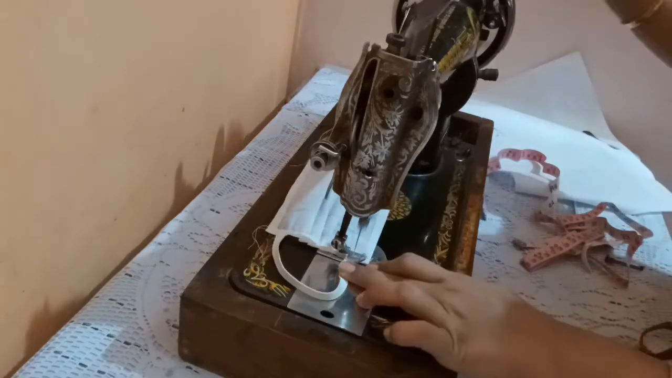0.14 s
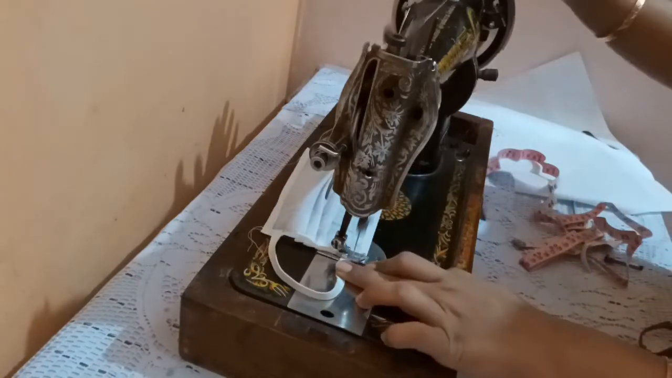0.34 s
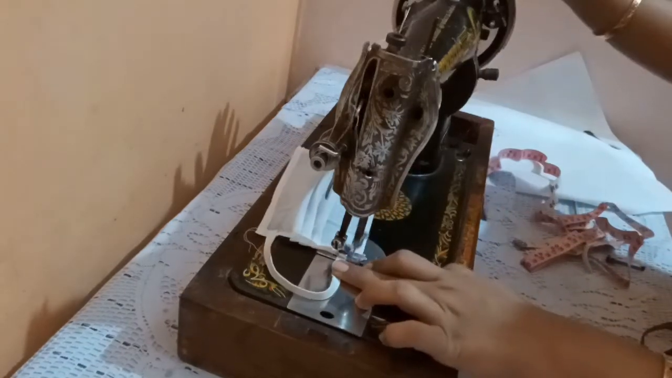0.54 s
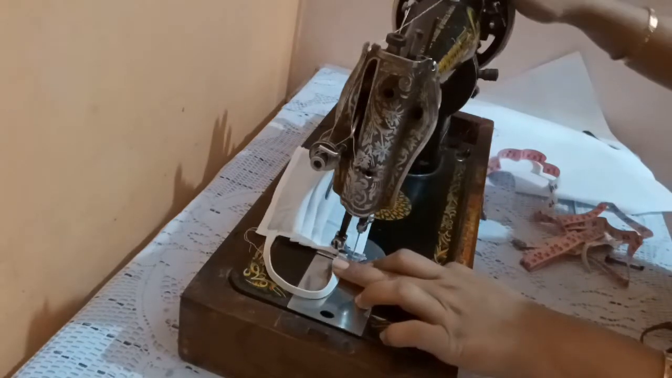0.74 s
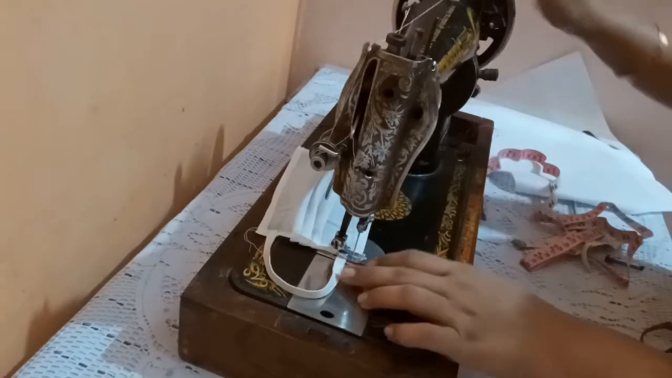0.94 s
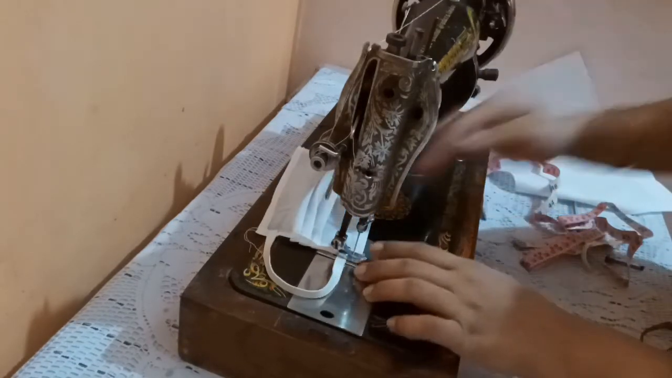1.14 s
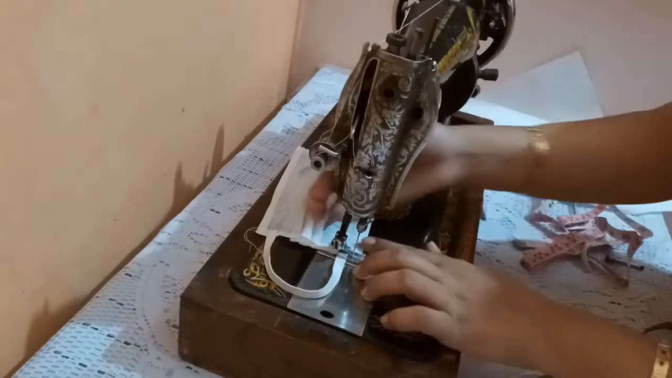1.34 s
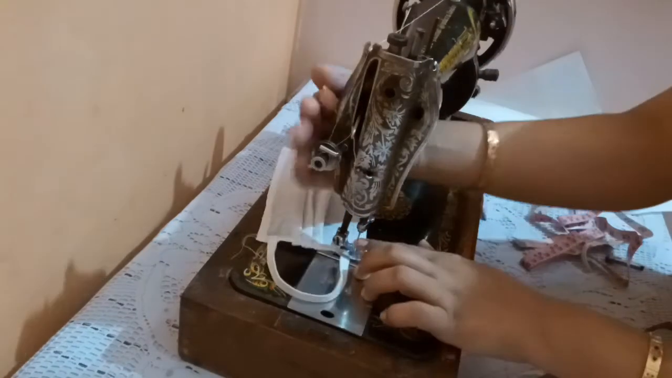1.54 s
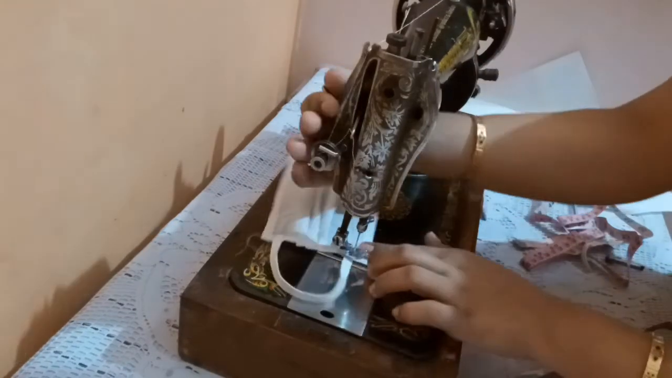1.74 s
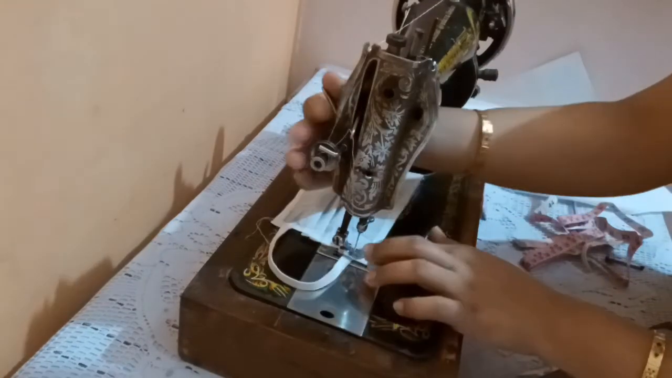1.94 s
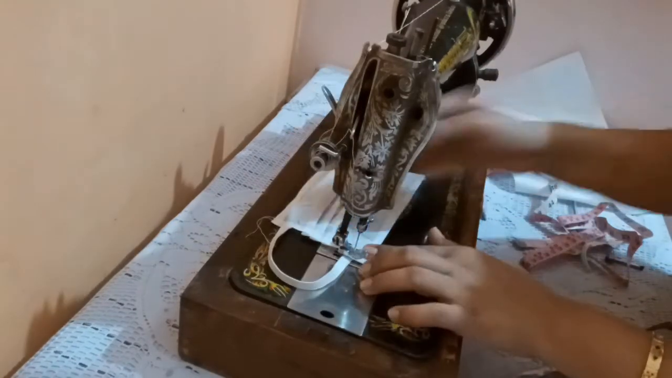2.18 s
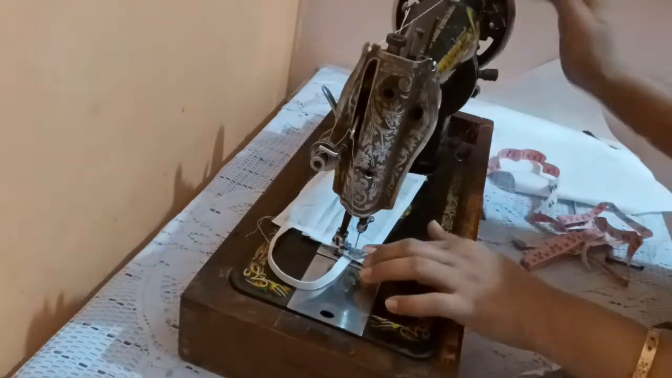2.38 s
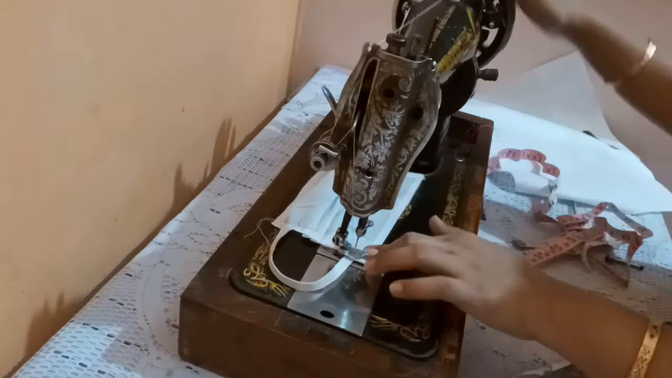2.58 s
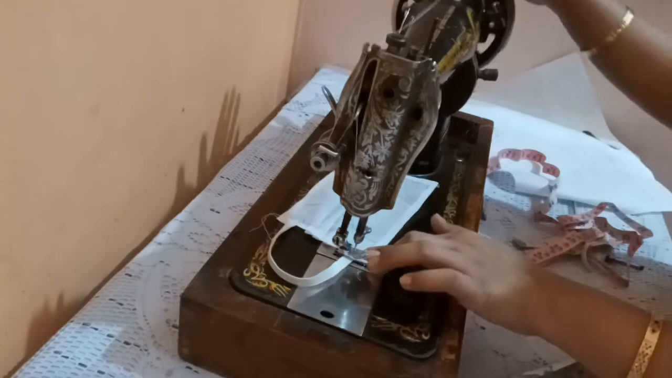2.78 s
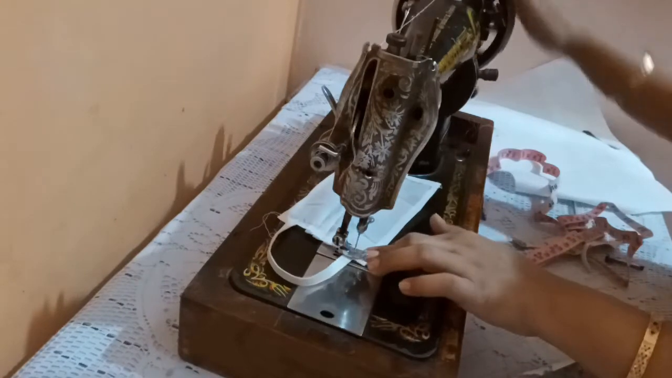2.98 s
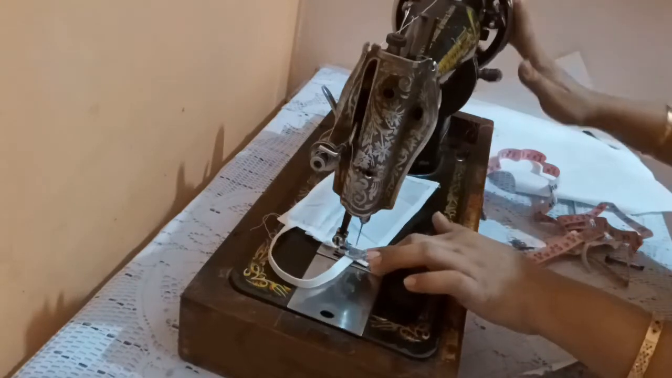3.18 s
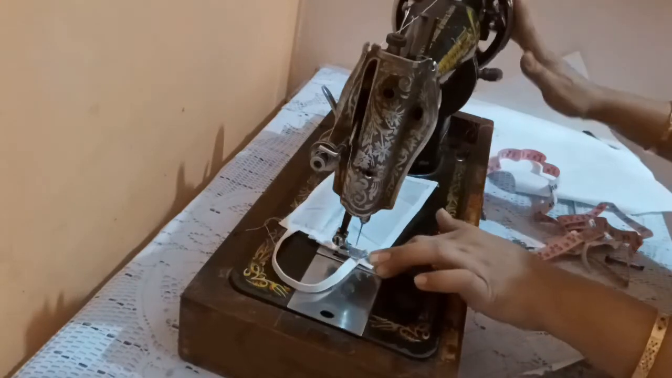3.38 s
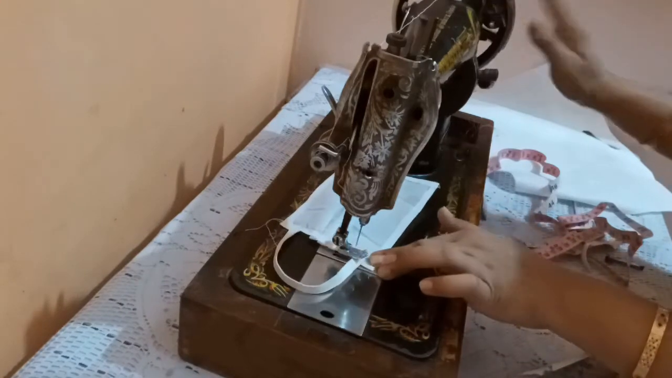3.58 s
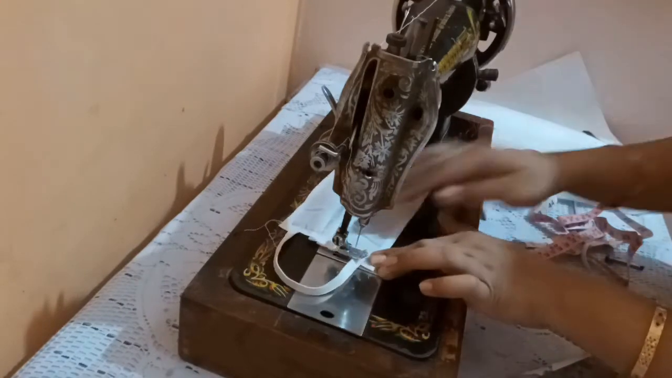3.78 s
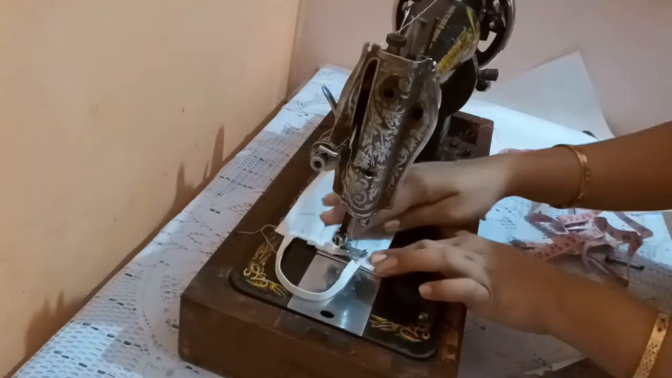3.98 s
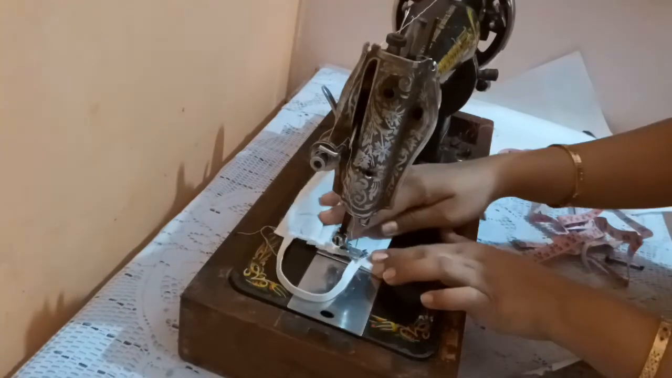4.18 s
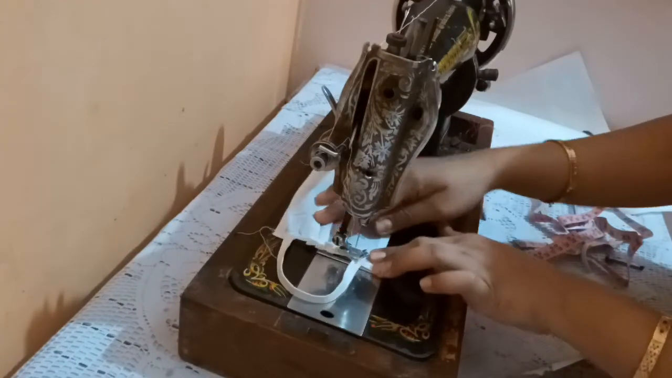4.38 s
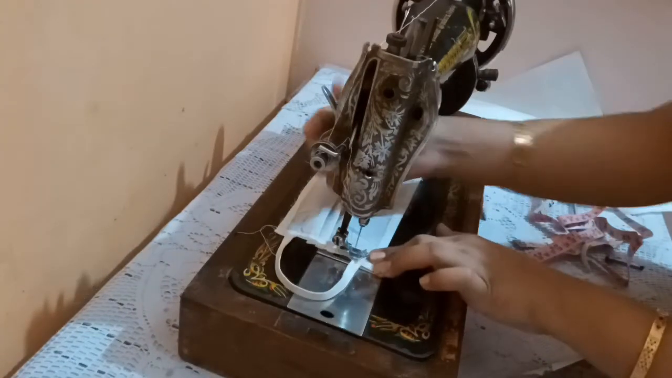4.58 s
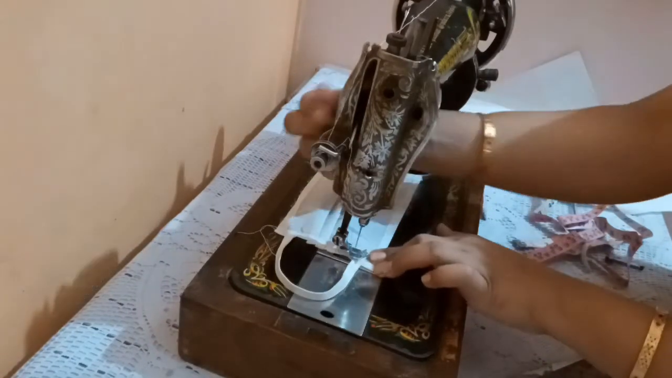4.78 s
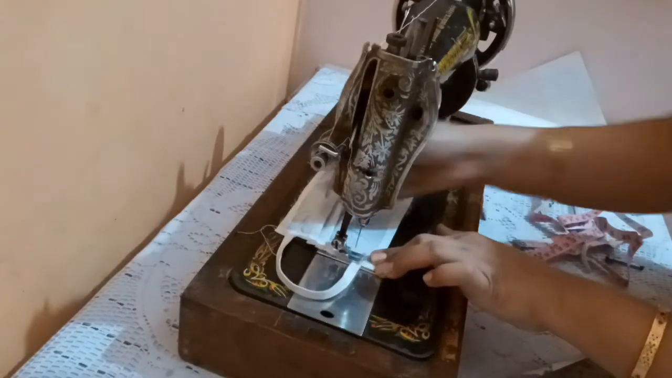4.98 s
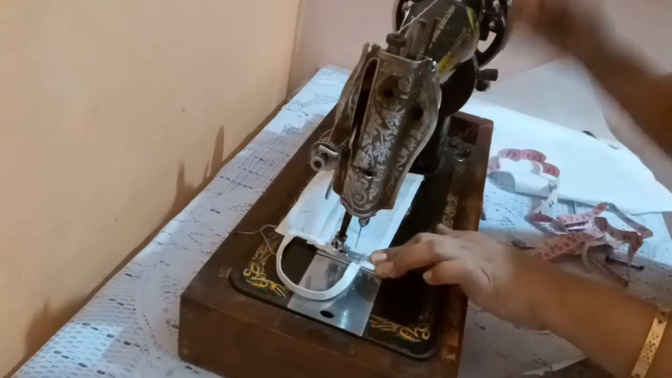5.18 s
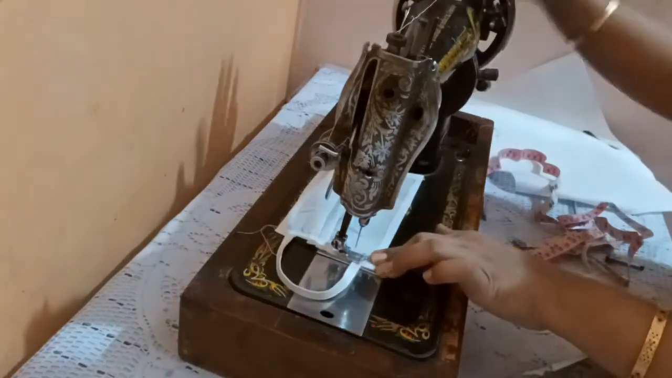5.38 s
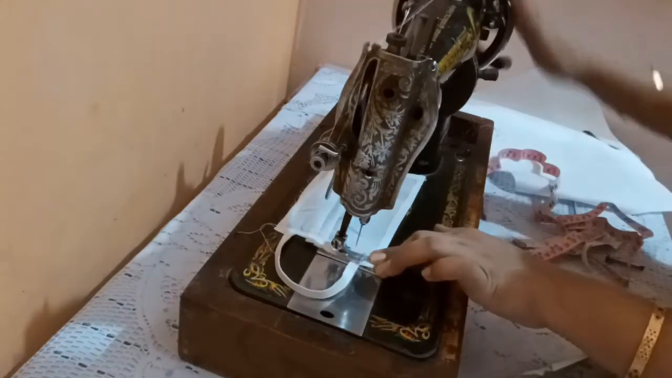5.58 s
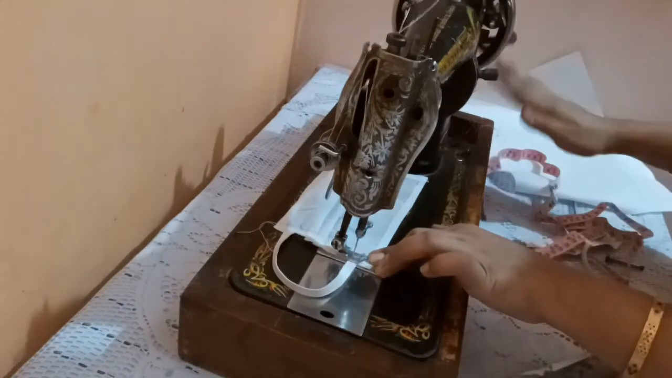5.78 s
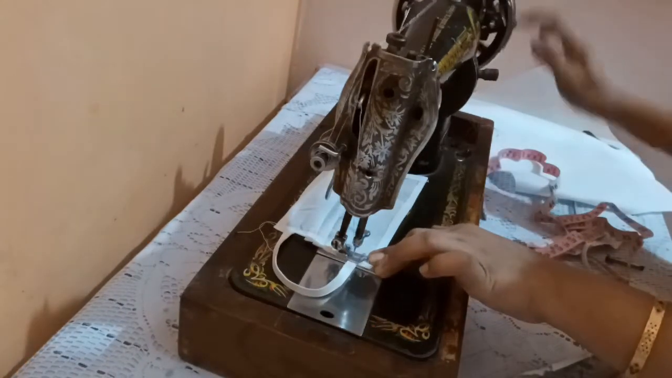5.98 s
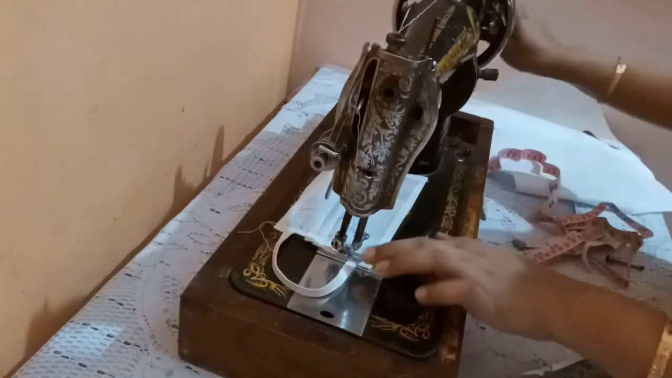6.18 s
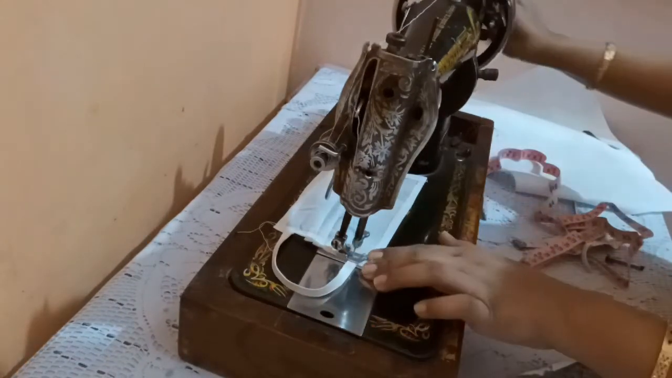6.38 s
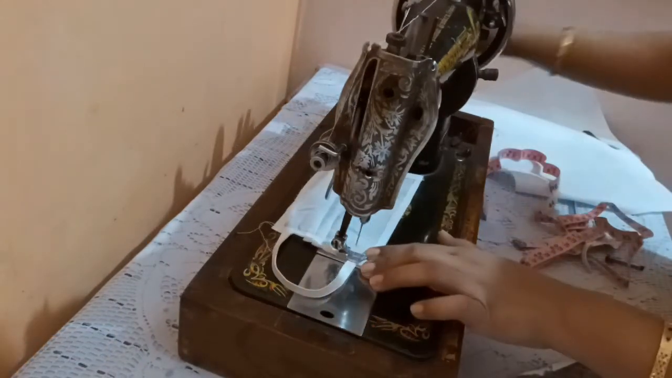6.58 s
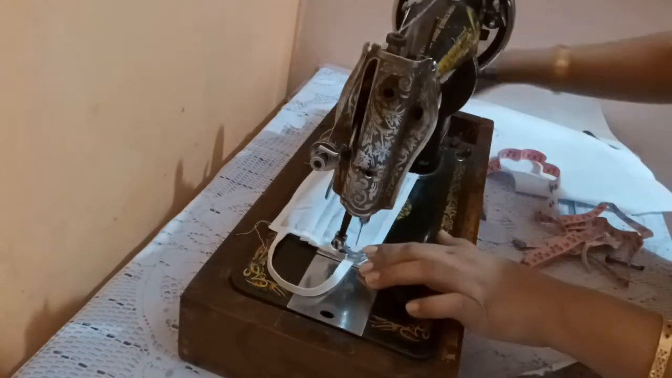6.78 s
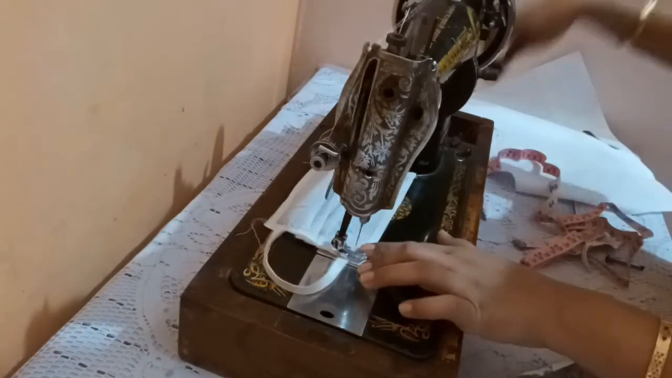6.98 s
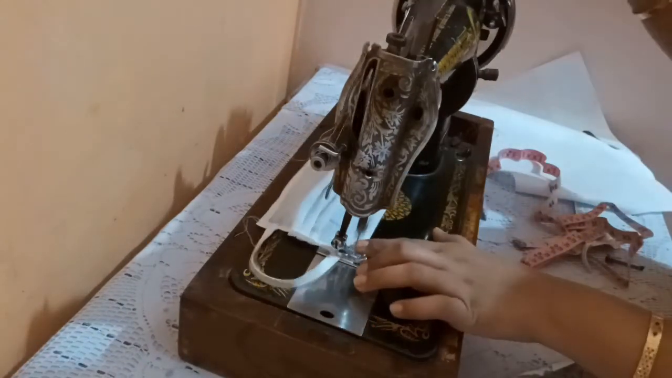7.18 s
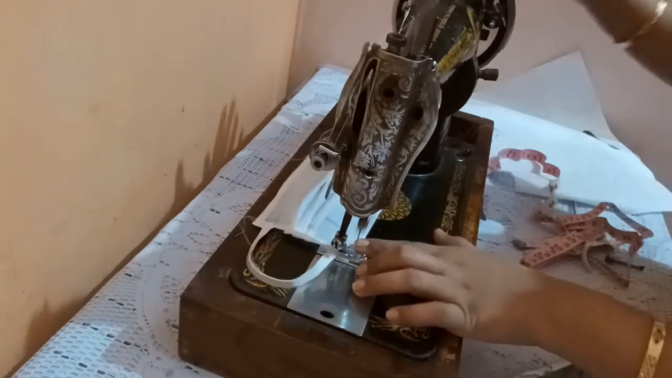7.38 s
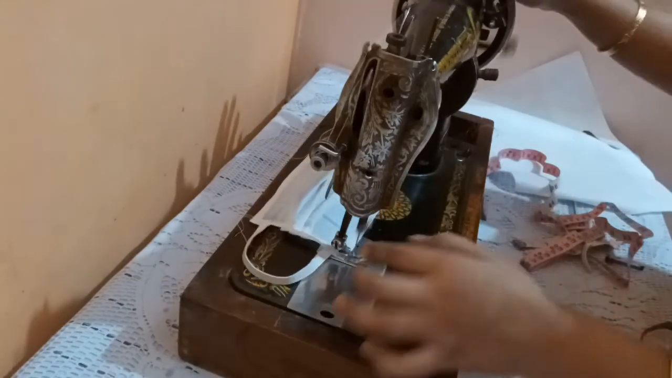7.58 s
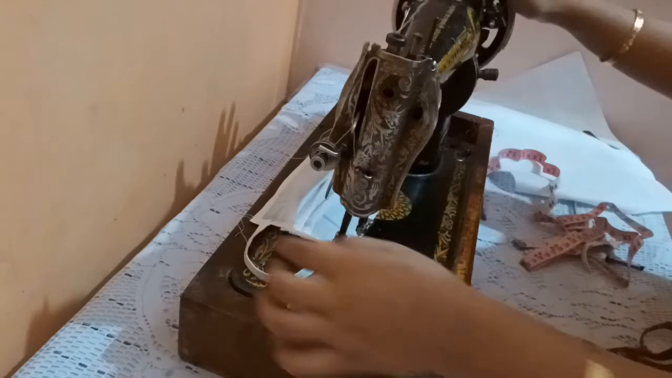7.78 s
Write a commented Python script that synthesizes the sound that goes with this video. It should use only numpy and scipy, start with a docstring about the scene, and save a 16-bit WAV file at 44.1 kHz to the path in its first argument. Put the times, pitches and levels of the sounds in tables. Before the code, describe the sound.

Close up in a small bare room, a hand-cranked iron sewing machine on a wooden case clatters through about five stitches, then stops. The presser foot snaps with a springy metallic twang, light knocks follow, and later a duller hollow thud. After more handwheel clunks and a rough crank scrape, a second, slightly faster burst of stitching rattles to the end over faint room noise.

```python
"""A small bare room, where a hand-cranked iron sewing machine on a wooden case runs in two short bursts.
Between them the handwheel is nudged and the presser foot is lifted and snapped down to turn the cloth.
Contacts are noise chatter through the resonances of steel and case; the foot's spring and the case booms
are decaying sines. Gear rattle and crank slips are noise too, and the walls answer with diffuse tails.
Behind lie steady room noise, a low drone and a faint far whistle."""
import sys
import numpy as np
from scipy import signal
from scipy.fft import rfft, irfft, next_fast_len
from scipy.io import wavfile
from scipy.ndimage import uniform_filter1d

SR = 44100
rng = np.random.default_rng(int(sys.argv[2]) if len(sys.argv) > 2 else 0)


def generate_wav(signal):
    """Clip the signal to [-1, 1] and save it as 16-bit WAV at the path in sys.argv[1]."""
    frames = np.transpose(np.atleast_2d(signal))
    scaled = np.clip(frames, -1, 1) * 32767
    pcm = np.round(scaled).astype(np.int16)
    wavfile.write(sys.argv[1], SR, pcm)


N = 346185
T = np.arange(32768) / SR  # time axis of one short sound, in seconds
HZ = np.fft.rfftfreq(len(T), 1 / SR)

# One turn of the shaft per row: take-up t/s, shuttle t/s, needle bar t/s, feed t/s,
# steel offset/dB, case offset/dB, extra shuttle tick/dB
STITCHES = [(-0.03, 0, 0.04, 0.075, -2, 2.5, -7.5), (0.173, 0.202, 0.248, 0.276, 1.5, -3.5, -2.5),
            (0.366, 0.398, 0.449, 0.468, 1.5, 2, -4), (0.571, 0.593, 0.649, 0.668, 0, -3.5, -1),
            (0.774, 0.811, 0.874, 0.911, -1.5, -1, 8), (6.942, 6.972, 7.046, 7.103, -3.5, 1.5, 0),
            (7.212, 7.232, 7.273, 7.299, -0.5, 1, -8.5), (7.386, 7.409, 7.454, 7.478, 1, 2.5, 4.5),
            (7.545, 7.567, 7.621, 7.645, 2, 0, 4), (7.722, 7.743, 7.796, 7.822, 2, 1, 3)]
# Resonances of the steel linkage: f/Hz, width/Hz, relative level/dB
LINKAGE = [(977, 32, 5.5), (1245, 350, 0), (1356, 19.56, 3), (1436, 25, 2.5), (1684, 120, 0),
           (1820, 120, -2.5), (2094, 34, 2.5), (2256, 67, -0.5), (2830, 940, -4), (4470, 1200, -12)]
# Resonances of the needle bar: f/Hz, width/Hz, relative level/dB
NEEDLE_BAR = [(3161, 60, -1.5), (3365, 64, 2.5), (3540, 120, -2.5)]
# Resonances of the small steel parts: f/Hz, width/Hz, relative level/dB
SMALL_PARTS = [(5510, 2600, -8), (6450, 780, -1.5), (7440, 650, 1), (8400, 1280, 0), (9560, 4900, -10.5),
               (12750, 1600, -15.5)]
# Resonances of the wooden panels: f/Hz, width/Hz, relative level/dB
PANELS = [(404, 55.5, -0.5), (454.8, 40, -1), (515, 20, 0), (583.2, 23.7, -2.5), (651, 31, -5.5),
          (910, 380, -15)]
# Low resonances of the hollow case: f/Hz, width/Hz, relative level/dB
CASE = [(67.1, 33, -13), (105.1, 24.26, -6), (151, 18, 3), (180.5, 25.4, 0), (267, 58, -10)]


def amp(db):
    """Decibels to gain."""
    return 10 ** (np.asarray(db) / 20)


def unit(x):
    """Scale to rms 1."""
    return x / np.sqrt(np.mean(x ** 2) + 1e-20)


def along(points, hz):
    """Interpolate (f/Hz, value) points on a log frequency axis."""
    f, v = np.transpose(points)
    return np.interp(np.log(hz + 1), np.log(f + 1), v)


def level(rows, column):
    """Gain per sample from one dB column of a curve, down at -120 dB outside it."""
    rows = np.asarray(rows)
    t = np.arange(N) / SR
    return amp(np.interp(t, rows[:, 0], rows[:, column], left=-120, right=-120))


def swell(start, end, db):
    """Gain per sample: a quick rise, a hold from start to end, a run-down."""
    rise_db_per_s, fall_db_per_s = 606, 170.5
    t = np.arange(N) / SR
    before = np.maximum(start - t, 0)
    after = np.maximum(t - end, 0)
    return amp(db - rise_db_per_s * before - fall_db_per_s * after)


def fade(t60):
    """A decay that loses 60 dB in t60 seconds."""
    return np.exp(-np.log(1000) * T / t60)


def filtered(x, response):
    """Multiply the spectrum of x by a function of frequency."""
    size = next_fast_len(N + SR)
    hz = np.fft.rfftfreq(size, 1 / SR)
    return irfft(rfft(x, size) * response(hz), size)[..., :N]


def body(modes, hz):
    """Causal response of a set of resonances, rolled off above twice the last one."""
    peaks = 0
    for k, (centre, width, db) in enumerate(modes):
        sign = (-1) ** k  # neighbours in opposite polarity
        peaks = peaks + sign * amp(db) * 1j * hz * width / (centre * centre - hz * hz + 1j * hz * width)
    u = hz / (2 * modes[-1][0])
    return peaks / (1 - u * u + 1j * np.sqrt(2) * u)


def shaped(force, response):
    """A force through resonances, scaled to the energy of 10 ms at rms 1."""
    x = irfft(rfft(force) * response)
    return x / np.sqrt(np.sum(x ** 2) / (SR / 100))


def walls(onset=0.0024):
    """A fresh diffuse room tail of energy 1, made of noise whose bass lingers longest; onset in seconds."""
    # Decay time of the room: f/Hz, t60/s
    room_decay = [(80, 1), (180, 0.64), (500, 0.43), (1500, 0.47), (3500, 0.43), (8000, 0.38),
                  (13000, 0.26)]
    hz, t, z = signal.stft(rng.standard_normal(len(T)), SR, nperseg=256)
    decay = np.exp(-np.log(1000) * t / along(room_decay, hz)[:, None])
    tail = signal.istft(z * decay, SR, nperseg=256)[1][:len(T)]
    tail = tail * (1 - np.exp(-(T / onset) ** 2))
    return tail / np.linalg.norm(tail)


def echo(x):
    """The room's answer to one short sound."""
    return signal.fftconvolve(x, walls())[:len(T)]


def blow(response, contact, t60, room_db):
    """A part chatters for the contact time and rings out; the walls return its colour as a diffuse tail."""
    envelope = np.exp(-np.log(1000) * np.maximum(T - contact, 0) / t60)
    chatter = rng.standard_normal(len(T)) * envelope
    return shaped(chatter, response) + amp(room_db) * shaped(walls(), response)


def add(track, s, x):
    """Mix x into the track at s seconds, trimming whatever falls outside."""
    start = round(s * SR)
    x = x[max(-start, 0):]
    part = track[max(start, 0):][:len(x)]
    part += x[:len(part)]


def contacts(rows, modes, column, gain_db, contact, t60, room_db, lag=0):
    """One part is struck at every row, as hard as the given dB column says; contact, t60 and lag in seconds."""
    track, response = np.zeros(N), body(modes, HZ)
    for row in rows:
        hit = blow(response, contact, t60, room_db)
        add(track, row[0] + lag, amp(row[column] + gain_db) * hit)
    return track


def rings(rows, attack, room_db):
    """Single modes, as sines, swell over the attack time, die away and linger in the room."""
    track = np.zeros(N)
    for s, db, hz, t60 in rows:
        sine = np.sqrt(2) * np.sin(2 * np.pi * hz * T)
        ring = amp(db) * sine * fade(t60) * (1 - np.exp(-T / attack))
        tail = echo(ring)
        tail_gain = amp(room_db) * np.linalg.norm(ring) / np.linalg.norm(tail)
        add(track, s, ring + tail_gain * tail)
    return track


def background():
    """Shaped noise for the room, resonant noise for a low drone, and a wavering sine for a thin far whistle."""
    # Colour of the room noise: f/Hz, relative level/dB (per Hz)
    air_colour = [(25, -20), (80, -5.5), (190, -6), (250, -13.5), (400, -6), (700, -7), (1300, -12.5),
                  (2750, -21), (3700, -22), (4400, -32), (6200, -37), (8200, -30), (9500, -42),
                  (13500, -42)]
    # Course of the whistle: t/s, level/dB
    whistle_curve = [(4.1, -84), (4.25, -73.5), (4.6, -78), (4.75, -73), (4.95, -73.5), (5.06, -83)]
    air = unit(filtered(rng.standard_normal(N), lambda hz: amp(along(air_colour, hz))))
    drone = unit(filtered(rng.standard_normal(N), lambda hz: body([(200.3, 12, 0)], hz)))
    waver = unit(uniform_filter1d(rng.standard_normal(N), size=200))
    pitch_hz = 3635 + 16 * waver
    whistle = unit(np.sin(2 * np.pi * np.cumsum(pitch_hz) / SR))
    return amp(-59.0) * air + amp(-65.5) * drone + level(whistle_curve, column=1) * whistle


def rattle(modes):
    """A dense random run of noisy scuffs, each waking only every other resonance of a part."""
    taps_per_s, spread_db, scuff_s = 75, 5.5, 0.0022
    total = np.zeros(N)
    for group in (modes[::2], modes[1::2]):
        strength = amp(spread_db * rng.standard_normal(N).clip(-2, 2))
        taps = (rng.random(N) < taps_per_s / SR) * strength
        envelope = signal.lfilter([1], [1, -np.exp(-1 / (scuff_s * SR))], taps)
        force = envelope * rng.standard_normal(N)
        total += filtered(force, lambda hz: body(group, hz))
    return unit(total)


def gears():
    """Turning gears scuff the steel and the case, in every handwheel motion and under the load of each stitch."""
    # The handwheel is in motion: start t/s, end t/s, level/dB ahead of the steel and wood trims
    spins = [(0, 0.918, -44.5), (0.949, 1.278, -55.5), (3.316, 3.44, -46.5), (3.485, 3.967, -55.5),
             (5.965, 6.18, -54), (6.52, 6.93, -48), (6.96, 7.844, -44.5)]
    load_db = -30  # ahead of the same trims
    steel = unit(rattle(LINKAGE) + amp(-7.0) * rattle(NEEDLE_BAR) + amp(-8.5) * rattle(SMALL_PARTS))
    wood = unit(rattle(PANELS) + rattle(CASE))
    spin = sum(swell(*row) for row in spins)
    # the gears are loaded from shuttle to feed
    load = sum(swell(shuttle, feed, load_db + db) for _, shuttle, _, feed, db, _, _ in STITCHES)
    steel_gain = amp(-12.0) * load + amp(-12.5) * spin
    wood_gain = amp(-8) * load + amp(-2.5) * spin
    x = steel_gain * steel + wood_gain * wood
    return x + amp(-6.5) * signal.fftconvolve(x, walls())[:N]


def crank():
    """The crank chafes on the handwheel: each steel slip is a rough, short ring with hiss and a nudge to the case."""
    # Chafes: t/s, length/s, first slip level/dB, reference f/Hz of the ring, first slip hiss level/dB
    chafes = [(1.029, .005, -42.5, 1690, -70), (6.442, .005, -50, 1860, -54.5),
              (6.461, .005, -36, 1720, -36), (6.472, .005, -29.5, 1700, -34), (6.495, .14, -36, 1900, -45),
              (7.099, .005, -40, 2106, -63), (7.493, .005, -23, 1780, -38)]
    # a long chafe is a string of ever weaker slips
    slip_step_s, scatter_s, fall_db_per_s, slip_t60_s = 0.011, 0.0027, 118, 0.044
    track = np.zeros(N)
    small = body(SMALL_PARTS, HZ)
    wood = body(PANELS, HZ) + body(CASE, HZ)
    for start, length, db, hz, hiss_db in chafes:
        ring = body([(.89 * hz, 110, -2), (1.016 * hz, 150, 0), (1.88 * hz, 900, -13)], HZ)
        for age in np.arange(0, length, slip_step_s):
            s = start + age + (age > 0) * rng.normal(0, scatter_s)  # the first slip is on time
            gain = amp(-fall_db_per_s * age)
            add(track, s, gain * amp(db) * blow(ring, contact=.002, t60=slip_t60_s, room_db=-6.5))
            add(track, s, gain * amp(hiss_db) * blow(small, contact=0.0023, t60=slip_t60_s, room_db=-5.5))
            add(track, s, gain * amp(db - 3) * blow(wood, contact=0.0051, t60=slip_t60_s, room_db=-1))
    return track


def ringing():
    """The foot's spring sings in several modes when let go, and the hollow case booms under the hand."""
    # Modes of the spring: f/Hz, level/dB ahead of the twang offset, t60/s
    spring_modes = [(3240, -27, .09), (2320, -26, 0.07), (2650, -30.5, .06), (1316, -39, 0.15),
                    (4570, -41.5, 0.088)]
    # The spring is let go: t/s, level offset/dB
    twangs = [(1.667, 1), (1.918, -6.5), (2.365, -21)]
    # Case booms: t/s, level/dB, f/Hz, t60/s
    booms = [(1.688, -27.5, 467, 0.064), (1.871, -37, 110, .25), (2.372, -44, 523, 0.11),
             (2.478, -41, 273, 0.14), (2.94, -29, 405, 0.11), (2.938, -31, 152, .16),
             (3.292, -36, 663, 0.29), (3.807, -42, 163, 0.16), (5.244, -25, 273, 0.097),
             (5.253, -24.5, 171, 0.25), (5.293, -14.5, 172.4, 0.053), (5.372, -35.5, 432, 0.093),
             (5.93, -32.5, 160, 0.09), (6.649, -35.5, 247, .13)]
    spring = [(s, db + mode_db, hz, t60) for s, db in twangs for hz, mode_db, t60 in spring_modes]
    return rings(spring, attack=0.00087, room_db=-8) + rings(booms, attack=0.0042, room_db=-4.5)


def presser_foot():
    """The sprung foot and its lever snap up and down: steel chatter, a sharp edge and a jolt to the case."""
    # Foot moves: t/s, snap level/dB, brightness offset/dB, jolt level/dB ahead of the case trims
    foot_moves = [(1.667, -26, -5, -39.5), (1.82, -41, -2.5, -43.5), (1.85, -30, -3, -27),
                  (1.867, -37.5, 0.5, -35), (1.918, -22, 0, -29), (2.256, -53.5, 2.5, -54),
                  (2.366, -43, -11.5, -50.5), (2.474, -46, -4.5, -43), (2.671, -62, -5, -56),
                  (5.13, -54.5, 0, -49.5), (5.21, -49, 4, -54), (5.22, -41.5, -6, -48),
                  (5.229, -36.5, 3, -38), (5.24, -32.5, 2, -35), (5.354, -37, -4, -41)]
    # Resonances of the lever: f/Hz, width/Hz, relative level/dB
    lever = [(1382, 238, -1.5), (1758, 87, 0), (2006, 220, -1.5), (2467, 260, 1.5), (2696, 290, 0),
             (3200, 140, 0), (3530, 290, -5), (4650, 640, -12)]
    # Resonances of the foot's sharp edge: f/Hz, width/Hz, relative level/dB
    foot_edge = [(10090, 1700, -0.5), (12500, 1500, 0)]
    edge_db, edge_growth, thump_db = -10.5, 2.8, -5  # growth in dB per dB of brightness
    rows = []
    for s, db, bright, jolt in foot_moves:
        edge_level = db + edge_db + edge_growth * bright
        rows.append((s, db, db + bright, edge_level, jolt, jolt + thump_db))
    snap = contacts(rows, lever, column=1, gain_db=0, contact=0.0049, t60=0.026, room_db=-5.5)
    tick = contacts(rows, SMALL_PARTS, column=2, gain_db=1.0, contact=0.0039, t60=0.0128, room_db=-10.0)
    edge = contacts(rows, foot_edge, column=3, gain_db=0.0, contact=0.0031, t60=0.0106, room_db=-11.5)
    knock = contacts(rows, PANELS, column=4, gain_db=-4.0, contact=0.0027, t60=0.0058, room_db=1.0, lag=.002)
    thump = contacts(rows, CASE, column=5, gain_db=-1.5, contact=0.003, t60=0.014, room_db=3.5, lag=0.0018)
    return snap + tick + edge + knock + thump


def machine_contacts():
    """Five contacts per stitch plus single clacks, as rows of t/s and clack, ring, tick, knock, thump level/dB."""
    # Rows: take-up, shuttle, needle bar, feed rises, feed drops. Levels ahead of stitch offsets and part trims:
    # # linkage clack level/dB, needle bar ring level/dB, small-parts tick level/dB, panel knock level/dB, #
    # case thump level/dB
    stroke = [(-37.5, -42.5, -41.5, -31.5, -34.5), (-32, -37.5, -33.5, -27, -31.5),
              (-34.5, -31, -43, -33.5, -36.5), (-41.5, -42, -40.5, -37.5, -36.5),
              (-46, -52, -46.5, -40, -35)]
    # The drive takes up its play when the handwheel is pushed or checked, levels ahead of the part trims:
    # t/s, linkage level/dB, needle bar ring level/dB, case level/dB
    clacks = [(0.213, -37.5, -30.5, -25), (0.72, -41, -45.5, -37.5), (0.983, -49, -56, -39),
              (1.153, -56, -63, -46), (2.903, -44.5, -51, -37.5), (2.917, -37, -37.5, -34),
              (2.938, -42, -41, -28), (3.006, -47, -49.5, -52), (3.27, -57, -62, -58),
              (3.285, -35, -31.5, -28.5), (3.405, -44.5, -63, -40), (3.805, -53, -45.5, -50),
              (3.967, -63, -71, -50), (5.764, -35, -35, -29), (5.789, -48, -42, -33),
              (5.925, -31.5, -31, -21.5), (5.97, -43, -50, -39), (6.155, -52, -57, -56),
              (6.164, -39.5, -36.5, -32.5), (6.648, -50, -49, -40), (6.74, -52, -56, -51),
              (6.779, -50, -59, -41), (6.883, -49, -55, -43), (6.999, -33, -29, -33),
              (7.246, -34, -30, -28), (7.286, -43, -40, -30), (7.418, -30, -26.5, -26)]
    feed_drop_s = 0.026  # after the feed rises
    tick_db, thump_db = -8, -0.5  # tick over the mean of clack and ring, thump over the case level
    rows = []
    for take_up, shuttle, bar, feed, steel, case, clash in STITCHES:
        times = (take_up, shuttle, bar, feed, feed + feed_drop_s)
        for s, (clack, ring, tick, knock, thump) in zip(times, stroke):
            tick_level = steel + tick + clash * (s == shuttle)
            rows.append((s, steel + clack, steel + ring, tick_level, case + knock, case + thump))
    for s, clack, ring, case in clacks:
        rows.append((s, clack, ring, (clack + ring) / 2 + tick_db, case, case + thump_db))
    return rows


def stitches():
    """The linkage takes up its slack several times a stitch; the case follows, heard largely through the room."""
    rows = machine_contacts()
    clack = contacts(rows, LINKAGE, column=1, gain_db=-0.5, contact=0.0026, t60=0.026, room_db=-2.0)
    ring = contacts(rows, NEEDLE_BAR, column=2, gain_db=-0.5, contact=0.0008, t60=0.007, room_db=-8.5)
    tick = contacts(rows, SMALL_PARTS, column=3, gain_db=-1.5, contact=0.0055, t60=0.0237, room_db=-5.5)
    knock = contacts(rows, PANELS, column=4, gain_db=-4, contact=0.0015, t60=0.037, room_db=2, lag=0.00089)
    thump = contacts(rows, CASE, column=5, gain_db=-3.0, contact=0.0022, t60=0.0116, room_db=-1.5, lag=0.0009)
    return clack + ring + tick + knock + thump


def scene():
    """Everything sits in the centre; only the treble scatters a little to the sides."""
    mid = stitches() + presser_foot() + ringing() + crank() + gears() + background()
    z = signal.stft(mid, nperseg=128)[2]
    random_phase = np.exp(2j * np.pi * rng.random(z.shape))
    scattered = signal.istft(z * random_phase, nperseg=128)[1][:N]
    treble = filtered(scattered, lambda hz: hz > 4050)
    side = amp(-13) * treble
    return np.array([mid + side, mid - side])


def record(dry):
    """The phone thins the deepest bass and cuts very steeply above its band limit."""
    low_hz, top_hz = 45, 13300
    x = filtered(dry, lambda hz: 1j * hz / (1j * hz + low_hz))
    return filtered(x, lambda hz: 1 / np.sqrt(1 + (hz / top_hz) ** 120))


dry = scene()
out = record(dry)
generate_wav(out)
```